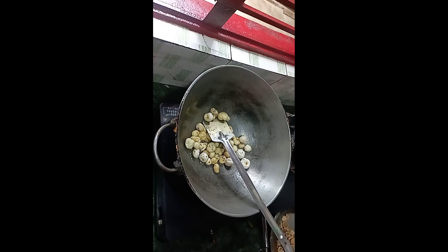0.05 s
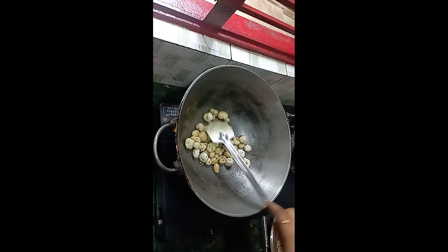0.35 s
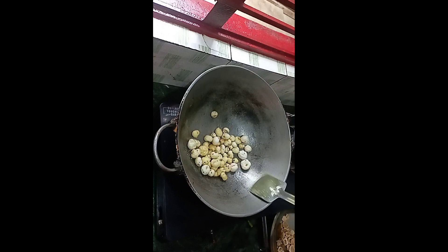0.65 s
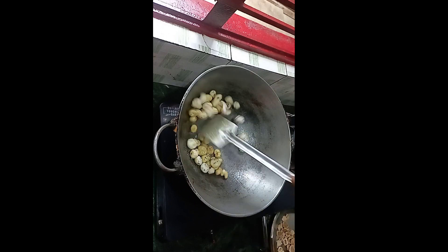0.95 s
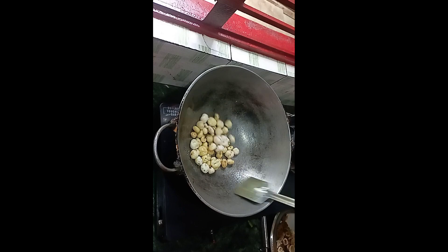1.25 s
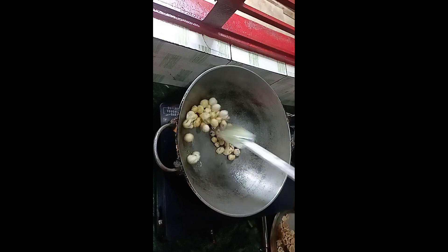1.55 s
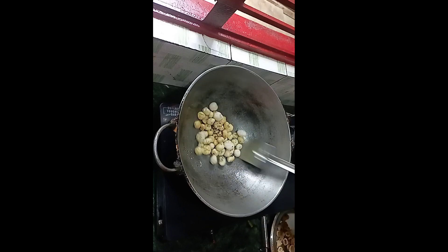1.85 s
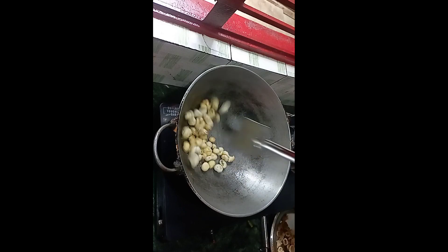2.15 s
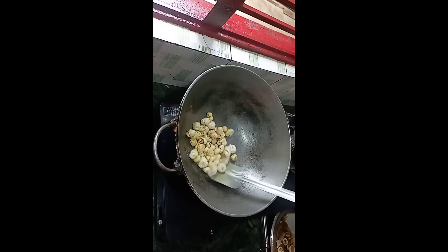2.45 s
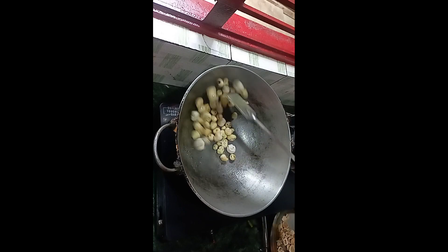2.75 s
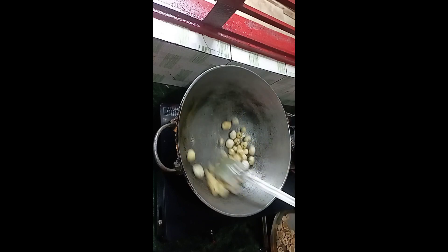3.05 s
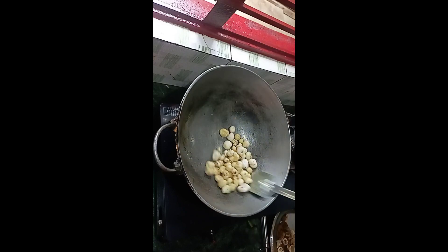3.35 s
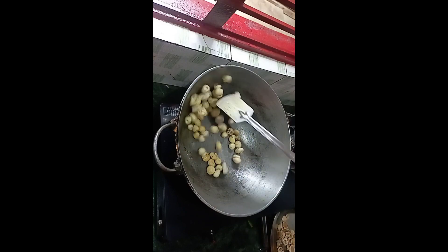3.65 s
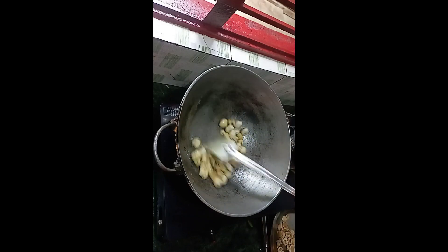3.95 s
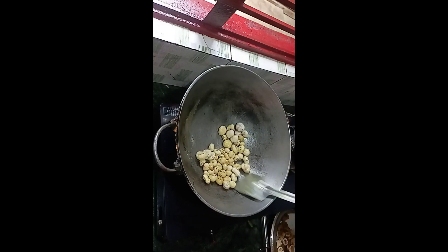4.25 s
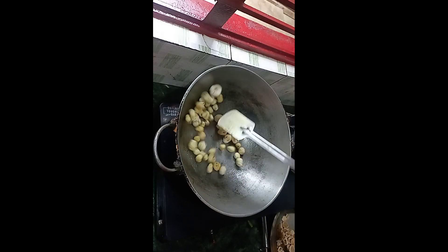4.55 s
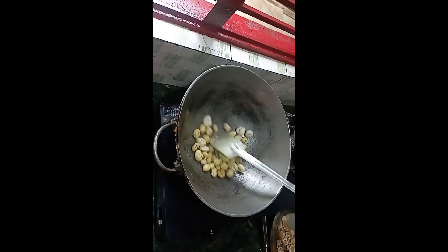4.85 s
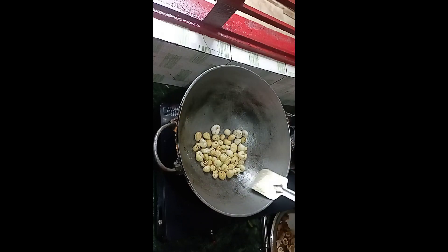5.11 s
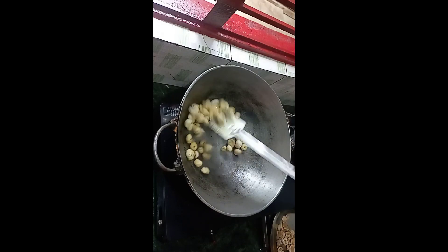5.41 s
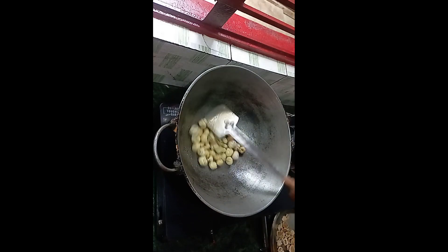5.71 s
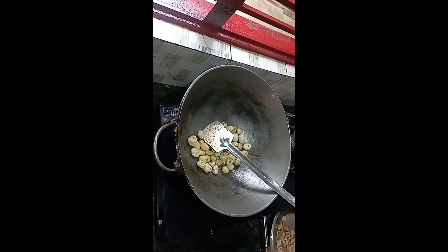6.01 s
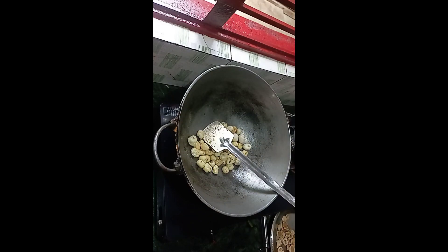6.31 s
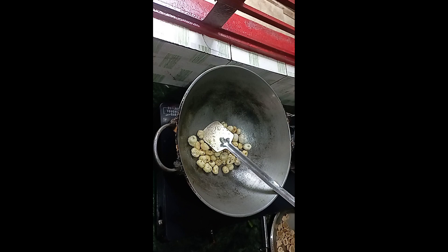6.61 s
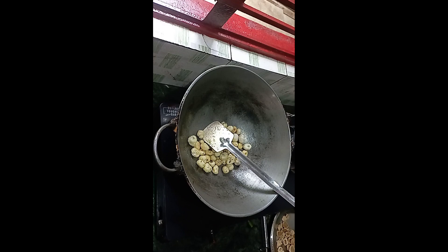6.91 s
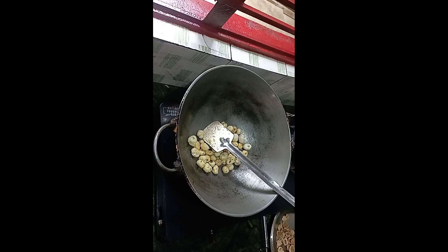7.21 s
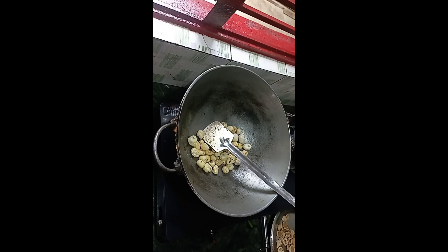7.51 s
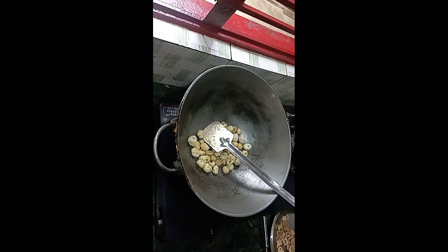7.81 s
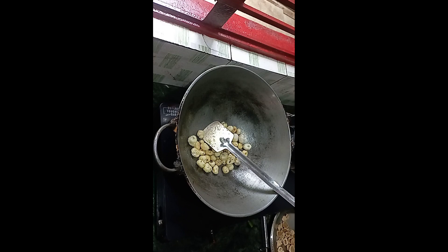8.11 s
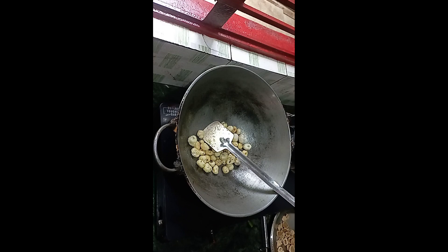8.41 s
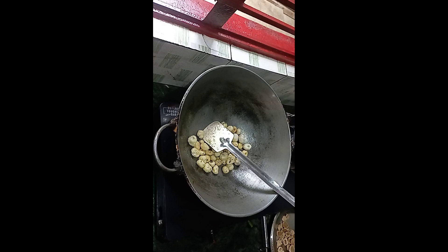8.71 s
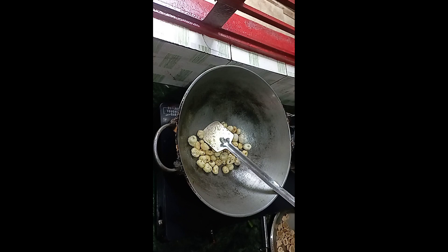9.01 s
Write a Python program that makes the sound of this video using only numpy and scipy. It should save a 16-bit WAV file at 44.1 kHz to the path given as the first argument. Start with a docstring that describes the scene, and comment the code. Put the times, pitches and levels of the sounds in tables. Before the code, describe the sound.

Close, bright clangs and short scrapes come in a steady rhythm as a metal spatula turns light, dry snacks in a wok. After about six seconds the spatula is dropped in with a damped clank, and a plastic packet rustles and snaps in flurries, slightly to the right. The small, hard kitchen adds a short echo, with faint oil sizzle and a muffled vehicle drone behind.

```python
"""In a small hard kitchen, a steel spatula turns puffed snacks in a hot wok. Each stroke knocks, chatters
and scrapes, making the steel ring, and the snacks tumble back with dry ticks. The spatula is dropped
in the wok, then a plastic packet is crinkled off to the right, its creases buckling and snapping.
Under it all lie a faint sizzle of oil, a low rumble and a vehicle engine droning outside."""
import sys
import numpy as np
from scipy import signal
from scipy.fft import rfft, irfft
from scipy.io import wavfile
from scipy.ndimage import uniform_filter1d

SR = 44100
rng = np.random.default_rng(int(sys.argv[2]) if len(sys.argv) > 2 else 0)


def output_pcm(signal):
    """Save a mono or channel-first signal as 16-bit PCM at the path in sys.argv[1].

    Samples are clipped to [-1, 1] before scaling.
    """
    pcm = np.clip(np.atleast_2d(signal).T, -1, 1) * 32767
    wavfile.write(sys.argv[1], SR, np.round(pcm).astype(np.int16))


N = 408454
T = np.arange(N) / SR
REST_S = 5.8  # from here the spatula lies in the wok and damps it
TICK_T60_S = .016  # a t60 is the time a sound takes to fade by 60 dB

# Blade strokes through the wok, with relative levels: start_s, end_s, first_db, last_db, tumble_db
STROKES = [(0.317, 0.35, -64, -36.5, -51.5), (0.755, 0.939, -38, -30.5, -46),
           (1.353, 1.502, -35, -40.5, -46.5), (1.85, 2.008, -36, -36.5, -45.5),
           (2.441, 2.601, -36, -36, -43.5), (3, 3.141, -45, -45.5, -51.5), (3.408, 3.539, -37, -30, -45),
           (3.876, 4.016, -46, -38, -66), (4.347, 4.458, -37.5, -34.5, -39.5), (4.74, 4.8, -69, -60, -46.5),
           (5.24, 5.422, -31, -36.5, -45), (5.793, 5.862, -37.5, -33, -66),
           (5.942, 6.065, -27.5, -39.5, -46)]
# Tone of steel under a sliding edge: pitch_hz, level_db
RASP_TONE = [(200, -54), (550, 1.5), (1100, -14), (1800, -10), (2500, -11.5), (4300, -1), (8000, 0),
             (11000, -1), (15500, -15.5)]


def undb(db):
    """Turn decibels into a gain to multiply by."""
    return 10 ** (np.asarray(db) / 20)


def unit(x):
    """Scale to an average power of 1."""
    return x / np.sqrt(np.mean(x ** 2))


def curve(rows):
    """Join (time_s, value) rows with straight lines."""
    return np.interp(T, *np.transpose(rows))


def gain_at(hz, tone):
    """Read the gain at a pitch from (pitch_hz, level_db) rows."""
    pitches, db = np.transpose(tone)
    return undb(np.interp(np.log(hz + 1), np.log(pitches), db))


def colour(x, tone):
    """Filter x to a tone of (pitch_hz, level_db) rows; white noise keeps its power."""
    size = 2048
    gain = unit(gain_at(np.arange(size // 2 + 1) * SR / size, tone))
    # fold the filter so that it never sounds ahead of its input
    cepstrum = irfft(np.log(gain))
    cepstrum[1:size // 2] *= 2
    cepstrum[size // 2 + 1:] = 0
    return through(x, irfft(np.exp(rfft(cepstrum))))


def through(x, response):
    """Let every sample of x set off the response (convolution), keeping the length."""
    return signal.oaconvolve(np.atleast_2d(x), np.atleast_2d(response), axes=1)[:, :np.shape(x)[-1]]


def add(out, start_s, x):
    """Mix x into out from start_s on."""
    i = int(start_s * SR)
    out[..., i:i + x.shape[-1]] += x[..., :out.shape[-1] - i]


def fade(t60, size):
    """A gain that falls by 60 dB every t60 seconds."""
    return np.exp(-np.log(1000) * T[:size] / t60)


def swell(start, top, end, release_db_per_s):
    """A gain that rises from start to top, holds until end and dies away."""
    rise = np.clip((T - start) / max(top - start, .001), 0, 1)
    return rise * undb(-release_db_per_s * np.maximum(T - end, 0))


def burst(t60, size=22050):
    """A fading puff of noise; left and right are alike only in the bass."""
    mid, side = rng.standard_normal((2, size))
    side = signal.sosfilt(signal.butter(1, 550, "high", fs=SR, output="sos"), side)
    return unit((mid + np.array([[1], [-1]]) * side) * fade(t60, size)) / np.sqrt(size)


def walk(rate):
    """A random wander around zero, heading for a new value rate times a second."""
    targets = rng.standard_normal(2048)
    return unit(np.interp(T * rate, np.arange(len(targets)), targets))


def grains(rate, spread_db):
    """Random clicks of uneven size, about rate a second."""
    size = undb(spread_db * np.clip(rng.standard_normal(N), -2, 2))
    return unit((rng.random(N) < rate / SR) * size * rng.choice([-1, 1], N))


def crackle(clicks, t60, count=14):
    """Each click rings one of several tiny patches of material, each with its own tone."""
    patch = rng.integers(count, size=N)
    return sum(through(clicks * (patch == k), burst(t60, size=1024)) for k in range(count))


def kitchen(x, wet_db):
    """The direct sound plus echoes from the close walls, wet_db setting their level."""
    response = undb(wet_db) * np.pad(burst(t60=.34), ((0, 0), (150, 0)))
    response[:, 0] = 1
    return through(x, response)


def air():
    """The house and street rumble low, much alike left and right in the bass."""
    # Tone of the rumble: pitch_hz, level_db
    rumble_tone = [(20, -25), (42, -33), (65, -8), (125, 1), (200, 1), (240, -4.5), (296, 3), (390, -7.5),
                   (735, -15), (1170, -22.5), (3000, -26), (15000, -42.5)]
    mid, side = colour(rng.standard_normal((2, N)), rumble_tone)
    side = signal.sosfilt(signal.butter(1, 900, "high", fs=SR, output="sos"), side) + 0.2 * side
    level_db = -48.5 + 0.043 * walk(rate=5.5) - 0.19 * (T - T.mean())
    return (mid + np.array([[1], [-1]]) * side) * undb(level_db)


def vehicle():
    """An engine outside drifts in speed; its wavering overtones boom through the walls."""
    # Engine speed: time_s, cycle_hz
    speeds = [(0, 12.8), (.9, 18.7), (1.83, 17.2), (2.3, 17.1), (3.8, 17.3), (4.5, 16.8), (5.7, 17.7),
              (7.3, 15.7), (9.26, 18)]
    # What the walls let through: pitch_hz, level_db
    wall_tone = [(45, -35), (62, -6.5), (76, -17), (83, -1), (90, -19), (110, -13.5), (123, 5.5),
                 (134, -9.5), (148, -13), (180, -17), (200, -3.5), (225, -30.5), (275, -10.5), (380, -20)]
    # Rise and fall of the drone: time_s, relative_db
    levels = [(0, -39), (1.7, -38), (2.4, -37.5), (4.0, -43), (5.65, -41), (5.76, -58), (7.25, -43),
              (7.9, -52), (9.26, -52)]
    cycle_hz = curve(speeds)
    phase = 2 * np.pi * np.cumsum(cycle_hz) / SR
    drone = np.zeros(N)
    for k in range(4, 20):
        overtone = np.sin(k * phase + rng.uniform(0, 2 * np.pi))
        waver = 1 + 0.34 * walk(rate=7.2)
        drone += gain_at(k * cycle_hz, wall_tone) * overtone * waver
    return unit(drone) * undb(curve(levels) - 2.5)


def sizzle():
    """Tiny bubbles burst in the film of hot oil."""
    # Tone of the bubbles: pitch_hz, level_db
    oil_tone = [(1000, -3.5), (4000, -14.5), (7000, -9), (10000, -4), (15500, -9)]
    pops = crackle(grains(rate=3500, spread_db=5.5), t60=TICK_T60_S, count=4)
    return undb(-57) * unit(colour(pops, oil_tone))


def effort():
    """How hard the hands work the packet: quick squeezes on top of a light hold."""
    # Squeezes of the packet: start_s, length_s, level_db
    squeezes = [(6.215, 0.069, -34), (6.325, 0.15, -44.5), (6.474, 0.19, -37), (6.81, 0.1, -39),
                (6.965, 0.14, -45.5), (7.124, 0.036, -33.5), (7.206, 0.11, -32.5), (7.379, 0.15, -38.5),
                (7.624, 0.14, -59), (7.835, .05, -46), (7.954, 0.12, -56), (8.314, 0.075, -52.5),
                (8.514, 0.055, -56), (8.655, 0.024, -33.5), (8.726, 0.12, -34.5), (8.941, 0.31, -40.5)]
    grip_s, hold_db = .039, -54.5
    squeezing = sum(undb(db) * swell(s, s + grip_s, s + length, release_db_per_s=129)
                    for s, length, db in squeezes)
    return squeezing + undb(hold_db) * (T > squeezes[0][0])


def packet():
    """Creases in the plastic film buckle in flurries: a fine rustle, lone crackles and sharp snaps."""
    # Sharp snaps of the film: start_s, relative_db
    snap_times = [(6.266, -16), (6.3628, -20.5), (6.4255, -19), (6.5125, -17), (6.528, -21), (6.648, -22),
                  (6.721, -22), (6.791, -23), (6.85, -26), (6.889, -19), (6.983, -23), (7.037, -26),
                  (7.181, -22), (7.293, -16), (7.463, -17), (7.589, -22), (7.659, -22), (7.754, -28.5),
                  (7.893, -28), (7.983, -23.5), (8.087, -30), (8.188, -35), (8.2895, -29.5), (8.3536, -30),
                  (8.444, -26), (8.511, -30), (8.591, -25.5), (8.677, -29), (8.751, -26), (8.9792, -26)]
    # Tone of the rustle: pitch_hz, level_db
    film_tone = [(150, -10), (320, 11), (600, 10.5), (1300, 1), (2000, 3), (3000, 7), (6500, 5), (10000, 8),
                 (15500, -7)]
    # Tone of a snap: pitch_hz, level_db
    snap_tone = [(500, -22), (2500, -2), (6500, 1), (10000, 5), (15500, -5)]

    def direct(x):
        """The right side is nearer and hears each crease first."""
        return np.array([np.roll(x, 18), x])

    hands = effort()
    flutter_db = 1.7 * walk(rate=41)
    rustle = hands * undb(-3 + flutter_db) * grains(rate=1800, spread_db=5.5)
    cracks = hands * undb(-3) * grains(rate=170, spread_db=4.5)
    for s, db in snap_times:
        add(cracks, s, undb([db + 12.5]))
    film = colour(0.49 * direct(rustle) + undb(-1) * crackle(rustle, t60=.023), film_tone)
    near = direct(crackle(cracks, t60=.005, count=4)[0])
    scattered = crackle(cracks, t60=.005, count=6)
    snaps = colour(near + scattered, snap_tone) / 2
    lean_right = undb([[-2], [1.4]])
    return (kitchen(film, wet_db=-4.5) + kitchen(snaps, wet_db=-9.5)) * lean_right


def snacks():
    """Each stroke sets light dry snacks ticking against each other and the wok."""
    # Single snacks dropping on the steel: start_s, relative_db
    drops = [(1.1659, -43), (1.24, -48), (2.1974, -51), (2.279, -40), (2.829, -49), (3.806, -43),
             (4.5325, -42), (4.587, -43), (4.6100, -38), (4.659, -42), (4.7500, -35.5), (4.8, -39.5),
             (4.9388, -42), (4.9721, -41.5)]
    # Tone of a tick: pitch_hz, level_db
    snack_tone = [(200, 10.5), (600, 15.5), (1200, 1), (3000, 5.5), (7000, 5), (10000, 6), (15500, -11)]
    fall_s = .17  # pushed snacks fall back just after the stroke ends, then settle
    tumbles = [undb(db) * swell(start, end + fall_s, end + fall_s, release_db_per_s=34)
               for start, end, _, _, db in STROKES]
    stir = np.sqrt(sum(tumble ** 2 for tumble in tumbles))
    ticks = grains(rate=900, spread_db=8.5) * stir * undb(-5)
    for s, db in drops:
        add(ticks, s, undb([db + 23.5]))
    return kitchen(colour(crackle(ticks, t60=TICK_T60_S), snack_tone), wet_db=0)


def stand(pitch_hz=352, t60=4.5):
    """A jolt sets the iron stand under the wok humming; the dropped spatula stills it."""
    # Blows that jolt the stand: start_s, level_db
    jolts = [(3.895, -51), (5.222, -39.5)]
    out = np.zeros(N)
    for s, db in jolts:
        add(out, s, undb(db) * np.sin(2 * np.pi * pitch_hz * T) * fade(t60, N))
    return out * undb(-60 * np.maximum(T - REST_S, 0))


def clink(start_s=.467):
    """The thin handle ticks on the rim as it is picked up, and rings on."""
    # Ringing notes of the handle: pitch_hz, level_db, t60_s
    handle_notes = [(2240, -47, 0.05), (3700, -50, 0.15), (4060, -49, 0.55), (5120, -41, 0.1)]
    out = np.zeros((2, N))
    add(out, start_s, undb(-5.5) * colour(burst(t60=.3), RASP_TONE))
    for hz, db, t60 in handle_notes:
        phase = 2 * np.pi * hz * T[:SR] + rng.standard_normal((2, 1))
        add(out, start_s, undb(db) * np.sin(phase) * fade(t60, SR))
    return out


def close_notes(spacing_hz):
    """Pick random steel notes above 1100 Hz, on average spacing_hz apart."""
    grid_hz = np.fft.rfftfreq(16384, 1 / SR)
    return (rng.random(len(grid_hz)) < grid_hz[1] / spacing_hz) * (grid_hz > 1100)


def crowd(notes, t60):
    """Many close notes are struck at once, each with a random strength, and fade together."""
    real, imag = rng.standard_normal((2, 2, len(notes)))
    tones = irfft(notes * (real + 1j * imag))
    size = tones.shape[1]
    return unit(tones * fade(t60, size)) / np.sqrt(size)


def contact_db(hz, flat_db, top_db):
    """A flat blow bends the bowl and brings out middle tones; a biting edge brings out top ones."""
    return flat_db * np.exp(-np.log(hz / 1800) ** 2 / 2) + top_db * (hz > 8500)


def wok_ring(low_db, scatter_db, flat_db=0, top_db=0, size=66150, longest_s=9):
    """The wok rings with its own notes, in a new balance for each spot the blade touches."""
    # Ringing notes of the wok and the blade on it: pitch_hz, level_db, t60_s
    wok_notes = [(297.5, -15.5, 2.1), (492.5, -12.5, 0.68), (625, -29, .8), (1165, -21, .25),
                 (1232, -19, .22), (1641, -20, .17), (1749, -20, .25), (2166, -13, .12), (2452, -13, .26),
                 (2680, -18, .18), (3359, -20.5, .28), (3768, -16, .22), (4177, -14, .2), (4995, -6, .15),
                 (5700, -8, .14), (6056, -8.5, .26), (6885, -6, .2), (7235, -1.5, .11), (7805, -5.5, .2),
                 (8712, -6, .2), (9111, -5, .16), (9252, -5, .18), (9436, 3.5, .08), (9612, -4, .16),
                 (9843, -3.5, .12), (10190, -1.5, .1), (11010, -1.5, .08), (11240, -4.5, .17),
                 (12555, -6.5, .12)]
    out = np.zeros((2, size))
    for hz, db, t60 in wok_notes:
        chance = rng.standard_normal(4)
        loaded = 1500 < hz < 4500  # the blade's load shortens and detunes these middle notes
        t60 = min(t60, .19 if loaded else longest_s)
        detune = 1 + (.02 if loaded else .00082) * chance[3]
        n = min(size, int(t60 * SR))
        height = min(hz / 2500, 1)  # low notes are much the same wherever the blade lands
        blow_db = low_db if hz < 1000 else contact_db(hz, flat_db / 2, top_db)
        gain = undb(db + scatter_db * height * chance[2] + blow_db)
        offsets = np.pi * height ** 2 * chance[:2, None]  # high notes reach left and right out of step
        out[:, :n] += gain * np.sin(2 * np.pi * hz * detune * T[:n] + offsets) * fade(t60, n)
    return out


def scrapes():
    """The edge catches and slips very fast; late in the stroke it digs in, bends and rasps."""
    # Bending notes of the pressed blade: pitch_hz, relative_db
    blade_notes = [(1780, -12), (2250, -11), (3350, -8.5), (3900, -13.5), (4550, -7.5)]
    # Tone of the steel as the edge digs in: pitch_hz, level_db
    grind_tone = [(900, -15), (1750, -10), (2700, -3.5), (4500, 1.5), (7000, -2.5), (15500, -44)]
    out, rubbing = np.zeros((2, N)), np.zeros(N)
    slips = grains(rate=1200, spread_db=5) * undb(3 * walk(rate=150))
    skid = .018 * walk(rate=35)  # as a share of the pitch
    muffle = signal.butter(2, 900, fs=SR, output="sos")  # the pressed blade mutes all but low notes
    for start, end, first_db, last_db, _ in STROKES:
        i, n = int(start * SR), 22050
        progress = T[:n] / max(end - start, .01)
        bend = np.minimum(progress, 1)
        pressure_db = first_db + (last_db - first_db) * bend ** 1.47
        pressure = uniform_filter1d(undb(pressure_db) * (progress < 1), 400)
        push = slips[i:i + n] * pressure
        add(rubbing, start, push)
        bowl = wok_ring(low_db=0, scatter_db=4, size=n, longest_s=.1 if start > REST_S else .4)
        add(out, start, undb(-40) * through(push, signal.sosfilt(muffle, bowl)))
        steel = crowd(close_notes(spacing_hz=80), t60=.07)
        add(out, start, undb(-3) * through(push * bend ** 2, colour(steel, grind_tone)))
        for hz, db in blade_notes:
            # the contact point travels, so each note slides and wavers
            slide = 1 + 0.0372 * rng.standard_normal() + 0.054 * (bend - .5) + skid[i:i + n]
            phase = 2 * np.pi * np.cumsum(hz * slide) / SR
            # each slip sets the note ringing briefly under the hand
            swing = through(push * bend * np.exp(-1j * phase), fade(t60=.028, size=4096))
            offsets = rng.uniform(0, 2 * np.pi, (2, 1))
            add(out, start, undb(db - 22) * np.real(swing * np.exp(1j * (phase + offsets))))
    rasp = colour(crackle(rubbing, t60=.035, count=4), RASP_TONE)
    return kitchen(out + undb(-0.5) * rasp, wet_db=-1.5)


def knocks():
    """The blade edge chatters for an instant as it lands; the steel clangs and the wok rings on."""
    # Spatula blows and their boosts to low, middle and top tones:
    # start_s, relative_db, low_db, flat_db, top_db
    blows = [(0.73, -20.5, -10, -12, -1.5), (0.736, -14.5, 3.5, -5.5, 4), (.7710, -37, 18, -5, -4),
             (1.299, -17.5, 2, -1, 5.5), (1.3134, -15.5, 5, -7.5, 2), (1.8137, -14, -10, -4.5, 0),
             (1.8406, -18, 5.5, -2, -1.5), (2.4221, -21, -6, -2, -4.5), (3.0236, -42.5, 11, 35, -12),
             (3.3836, -24.5, 5.5, -9, -1), (3.4527, -35.5, 20, 7, 2), (3.8937, -21, 6, 4, -4.5),
             (4.3255, -13.5, 6, -5, 2), (5.201, -15.5, 4, 3, 1), (5.222, -13, 12, 3, 2.5),
             (5.281, -25.5, 17, 13, -2), (5.307, -24, 6, 11, 1), (5.8105, -13, 3, 4, -3),
             (5.949, -10.5, -6, 4.5, -2)]
    # Tone of the crowd of steel notes in a blow: pitch_hz, level_db
    clang_tone = [(150, -14), (330, 1), (700, -1), (1050, -13.5), (1600, -11.5), (2200, -9), (3900, -9),
                  (5000, 1.5), (6100, 0), (7500, 3), (10000, 3.5), (12000, -0.5), (15500, -11.5)]
    out = np.zeros((2, N))
    size, chatter_s = 2048, .0032
    notes = close_notes(spacing_hz=55)  # the same in every blow
    for s, db, low_db, flat_db, top_db in blows:
        bounces = rng.choice([-1, 1], size) * (rng.random(size) < .06)
        chatter = bounces * np.exp(-T[:size] / chatter_s)
        chatter[0] = 1.8  # the first touch is the hardest
        chatter /= np.sqrt(np.sum(chatter ** 2))
        tone = [(hz, level + contact_db(hz, flat_db, top_db)) for hz, level in clang_tone]
        clang = colour(undb(-1) * burst(t60=.045, size=16384) + crowd(notes, t60=.15), tone)
        add(out, s, undb(db + 23.5) * through(clang, chatter))
        longest_s = .24 if s > REST_S else 9
        ring = wok_ring(low_db, scatter_db=6.5, flat_db=flat_db, top_db=top_db, longest_s=longest_s)
        add(out, s, undb(db - 13) * ring)
    return kitchen(out, wet_db=-9)


def scene():
    """Everything heard in the kitchen, added together."""
    return knocks() + stand() + clink() + scrapes() + snacks() + sizzle() + packet() + vehicle() + air()


def record(dry, port_hz=9650, port_q=6.9, port_db=-3, top_hz=15800):
    """The microphone's openings ring in the treble, loud peaks are rounded and the very top is cut."""
    b, a = signal.iirpeak(port_hz, port_q, fs=SR)
    rounded = np.tanh(dry + undb(port_db) * signal.lfilter(b, a, dry))
    return signal.sosfilt(signal.ellip(8, .2, 80, top_hz, fs=SR, output="sos"), rounded)


dry = scene()
out = record(dry)
output_pcm(out)
```